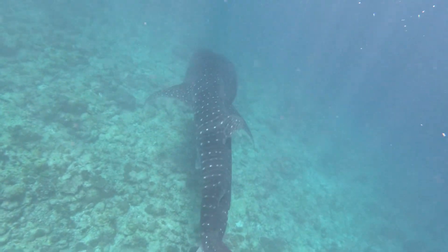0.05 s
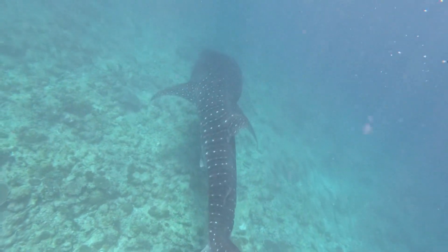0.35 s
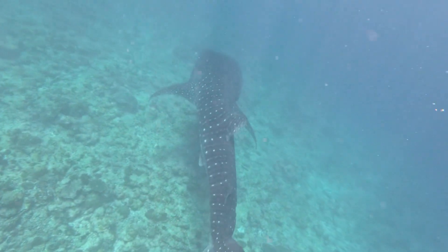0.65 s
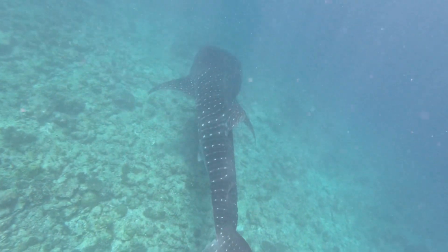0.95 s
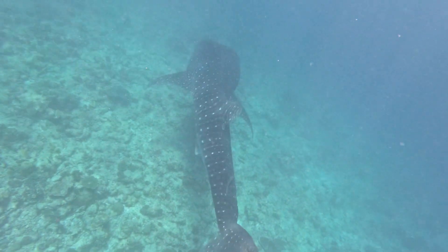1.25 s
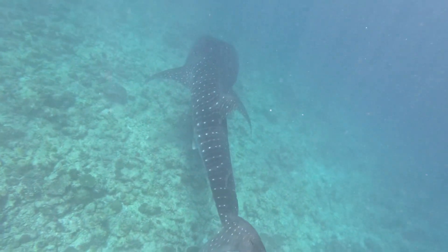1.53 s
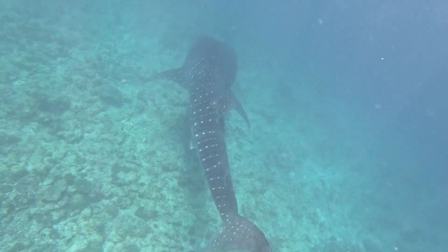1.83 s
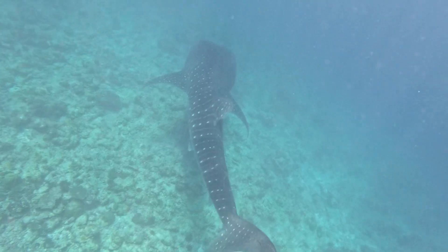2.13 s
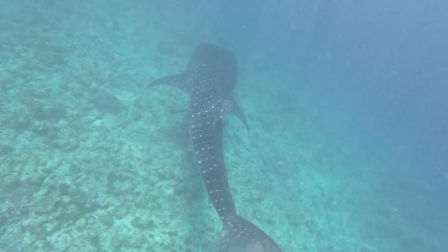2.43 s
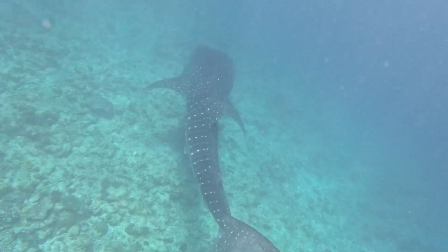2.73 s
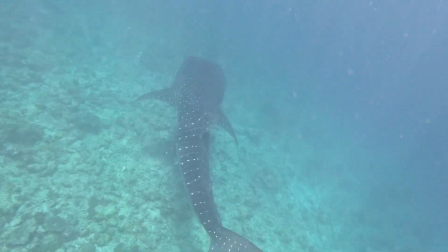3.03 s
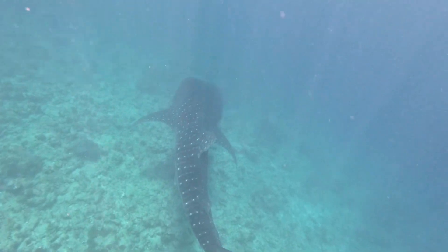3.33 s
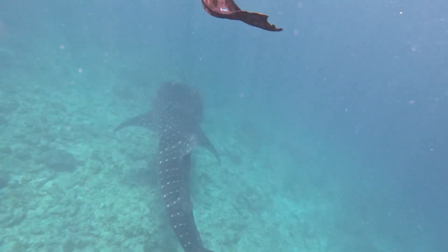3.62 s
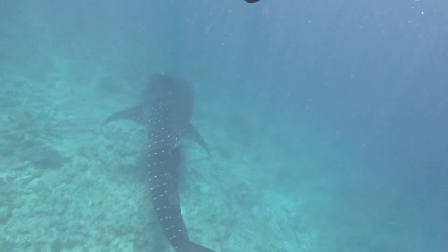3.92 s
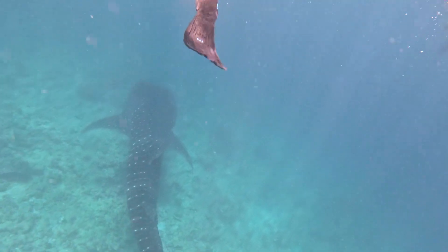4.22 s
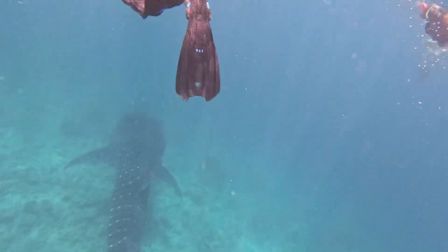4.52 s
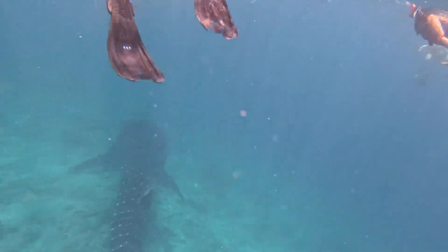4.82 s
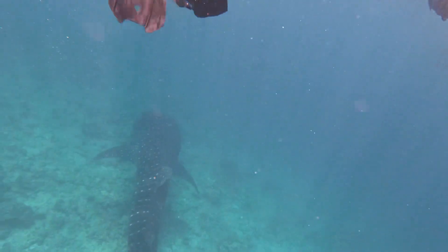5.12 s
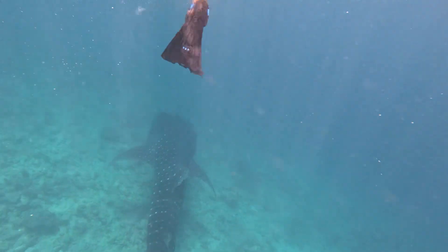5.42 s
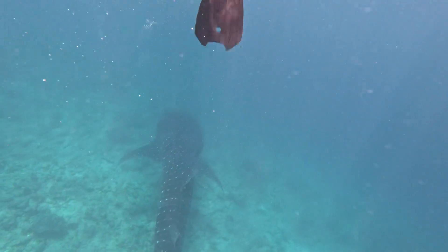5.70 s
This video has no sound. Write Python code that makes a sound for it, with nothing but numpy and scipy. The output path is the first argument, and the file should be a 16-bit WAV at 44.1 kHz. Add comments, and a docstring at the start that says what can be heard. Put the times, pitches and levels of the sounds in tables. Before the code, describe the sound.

Underwater, a muffled low rumble and soft gurgling surround a microphone inside a camera case. After about a second, a stream of small bubbles from kicking swim fins builds, pinging, crackling and popping against the case. One hard knock hits the case past four seconds. The fizzing then thins out, and deeper glugging bubbles take over near the end.

```python
"""Bubbles gurgle, ping and burst around a camera housing carried under water behind kicking swim fins.
Each bubble is a pocket of air ringing at the pitch of its size: large ones gurgle in plumes, small
ones drift by in a stream, pinging and popping against the case and ringing its walls. Flow rumbles on
the housing, snaps come from farther off, and one hard knock makes the limiter duck."""
import sys
import numpy as np
from scipy import signal
from scipy.fft import rfft, irfft
from scipy.io import wavfile
from scipy.ndimage import uniform_filter1d, map_coordinates

SR = 44100
rng = np.random.default_rng(int(sys.argv[2]) if len(sys.argv) > 2 else 0)


def master_out(mix):
    """Clip the mix to full scale and print it as 16-bit PCM to the path in sys.argv[1]."""
    frames = np.transpose(np.atleast_2d(mix))
    ceiling = np.clip(frames, -1, 1)
    pcm = np.round(ceiling * 32767).astype(np.int16)
    wavfile.write(sys.argv[1], SR, pcm)


N = 258426
TIME = np.arange(N) / SR
MID_PITCH_HZ = 1200

# stream of small bubbles arriving, thickening, leaving: t/s, ping level/dB, crackle level/dB
STREAM_LEVELS = [(0, -43, -57), (.45, -50, -62.5), (1.06, -42.5, -59.5), (1.3, -30, -48.5),
                 (1.55, -28.5, -44), (2.1, -28, -39), (2.9, -25, -40), (3.55, -21.5, -41.5),
                 (4.55, -27, -40), (4.82, -37.5, -50), (5.06, -45, -51), (5.17, -36, -58), (5.25, -43, -61),
                 (5.39, -39.5, -60.5), (5.55, -46, -65), (5.86, -50.5, -61.5)]
# commonest pitch in the stream: t/s, f/Hz
STREAM_PITCH = [(1, 1371), (2.2, 1265), (3.8, 1159), (4.6, 1176), (4.9, 1305), (5.8, 1368)]


def amp(db):
    """Decibels to gain."""
    return 10 ** (np.asarray(db) / 20)


def curve(rows, column=1):
    """One column of a control table, per sample."""
    rows = np.asarray(rows)
    return np.interp(TIME, rows[:, 0], rows[:, column])


def spectrum_db(points, hz):
    """Spectrum interpolated over log frequency."""
    f, db = np.transpose(points)
    return np.interp(np.log(hz + 1), np.log(f + 1), db)


def add(mix, start_s, sound):
    """Mix a sound in place."""
    part = mix[round(start_s * SR):][:len(sound)]
    part += sound[:len(part)]


def band(x, edges_hz):
    """Butterworth band-pass."""
    return signal.sosfilt(signal.butter(3, edges_hz, "band", fs=SR, output="sos"), x)


def steady(x, edges_hz, window_s):
    """Scale x to unit running rms in one band."""
    power = band(x, edges_hz) ** 2
    for _ in range(2):
        power = uniform_filter1d(power, int(window_s * SR) + 1)
    return x / np.sqrt(abs(power) + 1e-20)


def resonate(x, hz, width_hz):
    """Unity-gain resonance following a pitch curve."""
    carrier = np.exp(2j * np.pi * np.cumsum(hz) / SR)
    pole = np.exp(-np.pi * width_hz / SR)
    return 2 * (carrier * signal.lfilter([1 - pole], [1, -pole], x / carrier)).real


def response(points, modes=(), size=4096):
    """Minimum-phase impulse response of a broad spectrum plus resonances."""
    hz = abs(np.fft.fftfreq(size, 1 / SR))
    peaks_db = sum(lift_db / (1 + (2 * (hz - f) / width_hz) ** 2) for f, width_hz, lift_db in modes)
    log_gain = np.log(amp(spectrum_db(points, hz) + peaks_db))
    taps = np.fft.ifft(np.exp(np.conj(signal.hilbert(log_gain)))).real[:size // 2]
    return taps * signal.windows.tukey(size)[size // 2:]


def through(x, taps):
    """Convolve, keeping the length."""
    return signal.oaconvolve(x, taps)[:len(x)]


def noise(points):
    """Noise with a spectrum of f/Hz, level/dB points."""
    gain = amp(spectrum_db(points, np.fft.rfftfreq(N, 1 / SR)))
    return irfft(rfft(rng.standard_normal(N)) * gain, N)


def clicks(per_s, spread_db):
    """Random impulses of either sign: many small, a few large."""
    size = amp(spread_db * np.minimum(rng.exponential(1, N), 4))
    return size * rng.choice([-1, 1], N) * (rng.random(N) < per_s / SR)


def passing(events, crests_db, rest_db):
    """Gain of events swelling and fading as they pass; powers add to a resting level."""
    power = amp(rest_db) ** 2
    for (crest_s, half_s, *_), db in zip(events, crests_db):
        power = power + (amp(db) / (1 + ((TIME - crest_s) / half_s) ** 2)) ** 2
    return np.sqrt(power)


def bubble(hz, swell_s, decay_s, glide_oct_per_s=0):
    """An air pocket swells into ringing, glides and dies away; envelope peak 1."""
    t = np.arange(0, 2 * swell_s + 9 * decay_s, 1 / SR)
    envelope = (1 - np.exp(-(t / swell_s) ** 2)) * np.exp(-t / decay_s)
    phase = 2 * np.pi * np.cumsum(hz * 2 ** (glide_oct_per_s * t)) / SR
    return envelope / envelope.max() * np.sin(phase)


def cloud(low_hz, high_hz, per_s, cycles, spread_db):
    """Bubbles of many sizes, each decaying over a few cycles of its own pitch."""
    out, sizes, limit = np.zeros(N), 48, 12000
    starts_s = rng.random(limit) * N / SR
    gains = amp(spread_db * np.minimum(rng.exponential(1, limit), 3.5)) * rng.choice([-1, 1], limit)
    pitches_hz = np.geomspace(low_hz, high_hz, sizes)
    decays_s = cycles * rng.uniform(0.3, 2.05, sizes) / pitches_hz
    glides = rng.normal(0, 3.7, sizes)
    rings = [bubble(hz, 0.21 * s, s, glide) for hz, s, glide in zip(pitches_hz, decays_s, glides)]
    for k in range(min(int(per_s * N / SR), limit)):
        add(out, starts_s[k], gains[k] * rings[k % sizes])
    return out


def housing():
    """Impulse responses of the case: to a burst on its wall, and to sound from open water."""
    # broad wall response: f/Hz, level/dB
    wall = [(250, -38.5), (550, -14), (820, -5.5), (1150, 0), (1450, -3), (1800, -12), (2050, -20),
            (2900, -21), (3700, -17.5), (4300, -25), (5050, -38.5), (5800, -43.5), (6900, -40),
            (8000, -47.5), (9500, -67), (13000, -100)]
    # wall modes: f/Hz, width/Hz, lift/dB
    wall_modes = [(570, 33, 11.5), (1211, 95, 4), (1870, 140, 7), (2820, 93, 1.5), (3590, 230, 6),
                  (6390, 460, 9)]
    # transmission from open water: f/Hz, level/dB
    transmission = [(100, -11.5), (300, 2), (550, 7.5), (740, 3.5), (900, -7.5), (1080, -16), (1370, -14.5),
                    (1750, -37), (2000, -29), (2500, -38), (3300, -35), (4300, -43.5), (5500, -55.5),
                    (9000, -73), (13000, -99)]
    return response(wall, wall_modes), response(transmission)


def flow():
    """Eddies press on the housing: slow sway, quicker buffeting."""
    # flow spectra: f/Hz, level/dB
    sway_spectrum = [(2, -4.5), (9, 5), (28, 0.5), (50, -1), (70, -11.5), (140, -43.5), (400, -89.5)]
    buffet_spectrum = [(30, -29), (60, -2), (110, -2), (140, -8.5), (180, -14), (260, -34), (600, -76),
                       (1200, -100)]
    # surges of water: crest t/s, half-length/s, sway level/dB, buffet level/dB
    surges = [(0.4, 0.022, -31, -19), (0.792, 0.41, -24.5, -29.5), (1.152, 0.031, -19.5, -19.5),
              (1.565, 0.177, -18.5, -23), (2.219, 0.25, -39, -27.5), (2.681, 0.064, -37, -26.5),
              (3.063, 0.055, -16.5, -20), (3.304, 0.065, -27.5, -22.5), (3.571, 0.167, -22, -27.5),
              (4.23, 0.11, -20, -35), (4.724, 0.08, -18.5, -23), (4.968, 0.043, -18, -48.5),
              (5.071, 0.024, -34, -19), (5.581, 0.14, -32.5, -19), (5.789, 0.095, -24.5, -21)]
    _, _, sway_db, buffet_db = np.transpose(surges)
    sway = steady(noise(sway_spectrum), (18, 60), .09) * passing(surges, sway_db, rest_db=-28)
    buffet = steady(noise(buffet_spectrum), (60, 140), .05) * passing(surges, buffet_db, rest_db=-50)
    return amp(-1.3) * sway + amp(0.02) * buffet


def plume_gain(hz, rest_db):
    """Gain of one bubble size: a plume holds fewer the farther they are from its commonest pitch."""
    # plumes of churned air: nearest t/s, half-length/s, level/dB, commonest f/Hz
    plumes = [(0.268, 0.18, -29.5, 421), (0.685, 0.24, -24.5, 414), (1.002, 0.2, -25, 600),
              (1.227, 0.12, -25.5, 412), (1.488, 0.26, -25.5, 428), (2.118, 0.36, -29.5, 306),
              (2.656, 0.16, -28, 347), (3.296, 0.33, -29, 356), (3.399, 0.66, -33.5, 826),
              (3.597, 0.047, -27.5, 630), (3.765, 0.13, -31, 286), (4.104, 0.028, -28, 373),
              (4.257, 0.05, -27.5, 450), (4.632, 0.11, -33, 482), (4.953, 0.035, -33, 770),
              (5.071, 0.011, -24.5, 310), (5.397, 0.21, -25.5, 700), (5.504, 0.15, -19, 284),
              (5.775, 0.053, -27.5, 775), (5.854, 0.07, -19, 228.6)]
    falloff_db_per_oct2 = 9
    crests_db = [db - falloff_db_per_oct2 * np.log2(hz / f) ** 2 for _, _, db, f in plumes]
    return passing(plumes, crests_db, rest_db)


def churn(muffle):
    """Air whipped under by the fins: big pockets glug, smaller ones gurgle, muffled by the case."""
    wander_oct = .12
    pockets = cloud(164.6, 358, per_s=130, cycles=2.86, spread_db=2.5)
    large = cloud(347.9, 621, per_s=260, cycles=4.33, spread_db=2)
    drift = noise([(1, 3), (10, -5), (30, -42.5), (100, -120)])
    wall_mode_hz = 520 * 2 ** (wander_oct * drift / drift.std())
    large = large + amp(-1.5) * resonate(large, wall_mode_hz, width_hz=75)  # the case's lowest wall mode rings along, its pitch wandering
    medium = cloud(636.6, 824, per_s=220, cycles=3.9, spread_db=3)
    pockets = steady(through(pockets, muffle), (160, 340), .11) * plume_gain(hz=227, rest_db=-40.5)
    large = steady(through(large, muffle), (380, 620), .13) * plume_gain(hz=446, rest_db=-45)
    medium = steady(through(medium, muffle), (640, 860), .11) * plume_gain(hz=780, rest_db=-53)
    return amp(-2.5) * pockets + large + amp(-2) * medium


def shifting_modes(x):
    """Upper resonances of the case sink and rise with the pitch of the stream."""
    # peaks and dips: f/Hz at mid pitch, width/Hz, lift/dB, pitch-tracking exponent
    modes = [(2274, 85, 15.5, 0.18), (2533, 180, -8.5, 0.56), (2700, 80, 2, 0.99), (2970, 230, -5, 1),
             (3260, 130, 4.5, 0.44)]
    ratio = curve(STREAM_PITCH) / MID_PITCH_HZ
    for hz, width_hz, lift_db, exponent in modes:
        x = x + (amp(lift_db) - 1) * resonate(x, hz * ratio ** exponent, width_hz)
    return x


def pinging(case):
    """Small bubbles ping beside the case, lower in pitch while the stream is coarser."""
    pitch_hz = curve(STREAM_PITCH)
    pings = cloud(897, 1812, per_s=700, cycles=2.87, spread_db=2.5)
    speed = (pitch_hz / MID_PITCH_HZ) ** 1.4  # all sizes shift with the commonest pitch
    pings = map_coordinates(pings, [np.cumsum(speed)], order=1, mode="wrap")
    pings = shifting_modes(through(pings, case))
    pings = pings + amp(6.5) * resonate(pings, pitch_hz, width_hz=100)  # like sizes ring together
    return amp(-2.5) * steady(pings, (1000, 1600), .2) * amp(curve(STREAM_LEVELS))


def wall_contact():
    """How much of the stream bursts right on the case, 0-1."""
    touch_s, rise_s, leave_s, fall_s, stray_share = 1.04, 0.11, 5.273, 0.46, 0.18
    touch = np.minimum((TIME - touch_s) / rise_s, (leave_s - TIME) / fall_s)
    return np.clip(stray_share + np.maximum(touch, 0), 0, 1)


def crackle(case, muffle):
    """Clumped bursts ring the walls, the tiniest bubbles tinkle, far bursts merge into a soft bed."""
    level_db, full_density_db = curve(STREAM_LEVELS, column=2), -46.5
    clumps = noise([(1, 2), (25, -5.5), (70, -12), (170, -33), (500, -95.5)])
    bursts = clicks(per_s=2400, spread_db=4) * amp(3.66 * clumps / clumps.std())
    kept = rng.random(N) < amp(level_db - full_density_db)  # a weak stream thins out
    bursts = through(bursts * kept, case)
    tinkle = through(cloud(2150, 4440, per_s=410, cycles=6, spread_db=4), case)
    near = bursts / band(bursts, (2100, 4500)).std() + amp(-4.5) * tinkle / tinkle.std()
    near = steady(shifting_modes(near), (2100, 4500), .12)
    ticks = band(clicks(per_s=400, spread_db=5), (1100, 6000))
    far = through(rng.standard_normal(N) + amp(-5.5) * ticks / ticks.std(), muffle)
    far = steady(far, (2100, 4500), .3)
    contact = wall_contact()
    return (amp(-1.1) * near * contact + far * np.sqrt(1 - contact ** 2)) * amp(level_db)


def gush_gain():
    """Gushes thrown by the fins briefly lift or dip the level of the stream."""
    # crest t/s, half-length/s, gain/dB
    gushes = [(1.276, 0.02, -0.5), (1.702, 0.018, -2.5), (2.58, 0.097, 1.5), (3.183, 0.081, 1.5),
              (3.427, .025, 4), (4.03, 0.042, 3.5), (4.13, .05, -0.5), (4.526, 0.042, 1.5),
              (5.048, .05, -3.5)]
    return amp(sum(db * np.exp(-((TIME - crest_s) / half_s) ** 2) for crest_s, half_s, db in gushes))


def wall_hum():
    """Bubbles bumping along the case keep its lowest mode ringing, less as the stream goes by."""
    mode_hz, width_hz, sag_db_per_s = np.full(N, 543), 79, 2.5
    bumps = clicks(per_s=200, spread_db=1)
    hum = resonate(resonate(bumps, mode_hz, width_hz), mode_hz, 2 * width_hz)
    gain = amp(-31.5 - sag_db_per_s * np.maximum(TIME - 2, 0)) * wall_contact()
    return steady(hum, (380, 700), .15) * gain


def hollow(x):
    """A moving spectral dip between gurgle and pinging, deepest as the stream leaves."""
    # t/s, f/Hz, width/Hz, gain/dB
    dip = [(0, 1000, 119.5, -5.5), (.9, 1028, 119.3, 3.5), (1.4, 1030, 128, -14), (1.9, 845, 109.3, -13),
           (2.7, 790, 129, -3), (3.3, 640, 59.5, -10), (4.1, 635, 60, -1), (4.5, 834, 90, -5),
           (4.8, 960, 150, -14), (4.95, 1010, 169, -36), (5.1, 1010, 149, -19.5), (5.35, 1000, 119, -8)]
    hz, width_hz, gain_db = (curve(dip, column) for column in (1, 2, 3))
    for side in (-1, 1):  # two close notches make a flat bottom
        x = x + (amp(gain_db / 2) - 1) * resonate(x, hz + side * width_hz / 4, width_hz=120)
    return x


def near_bubbles():
    """Single bubbles close enough to stand out, wobbling as they ring."""
    # t/s, f/Hz, level/dB, swell/s, decay/s, glide/(oct/s)
    bubbles = [(.002, 376, -18, 0.0018, 0.016, 0), (.165, 494, -18, 0.0081, 0.015, -11),
               (.285, 280, -21, 0.0064, 0.017, -1.5), (.38, 554, -17, 0.0054, 0.012, 1.5),
               (.505, 580, -22.5, 0.0055, 0.014, -1.5), (.555, 435, -19.5, 0.006, 0.013, 0),
               (.607, 1950, -40, .002, 0.0046, 0), (.65, 581, -15.5, .008, 0.013, 1),
               (.681, 1353, -25.5, 0.013, 0.0086, -1), (.735, 455, -26, 0.0063, .016, -0.5),
               (.802, 1052, -25.5, 0.0067, 0.0065, -1.5), (.995, 460, -17, 0.011, 0.017, 9),
               (1.084, 667, -15.5, 0.0082, 0.012, -6.5), (1.119, 2220, -39, .002, 0.0064, 1),
               (1.183, 486, -17, 0.011, 0.017, -6), (1.22, 507, -20, .007, 0.016, 4.5),
               (1.483, 583, -16, 0.0076, 0.0068, -1), (1.506, 1305, -14, 0.0027, 0.0033, -1),
               (1.633, 1154, -18.5, .005, .009, 4), (1.778, 1334, -19, .003, .008, -1),
               (1.829, 420, -14.5, .002, 0.0067, 7), (2.065, 990, -18, .0014, 0.0039, -6),
               (2.12, 1413, -16, .0033, 0.0055, -7), (2.168, 1340, -10, .0015, 0.0029, -9),
               (2.219, 1078, -16, 0.0026, 0.0053, 2), (2.317, 1224, -13, 0.00093, .011, -3),
               (2.521, 1054, -14, .0018, 0.006, 4), (2.612, 512, -19, 0.0062, 0.017, 0),
               (2.7504, 1213, -11, .001, 0.003, -5), (2.8125, 1273, -9.5, 0.0017, 0.0073, -8),
               (2.846, 562, -14.5, 0.0059, 0.008, 0.5), (2.857, 1178, -15.5, 0.0026, .0064, 2),
               (2.89, 1091, -12, 0.0034, 0.0089, -1), (2.995, 1205, -13, .001, 0.0077, 0),
               (3.211, 1336, -18, 0.0019, .006, 4), (3.373, 569, -11.5, 0.00082, 0.01, -2.5),
               (3.394, 532, -14, .003, 0.0068, -1), (3.45, 1423, -11, .0023, 0.0076, -4),
               (3.509, 1190, -14.5, 0.00073, .0045, -1), (3.589, 347, -6, 0.0008, 0.0032, 6),
               (3.59, 720, -21, .001, .004, 13), (3.602, 468, -12.5, .0033, .0087, -1),
               (3.625, 1650, -18.5, .001, .003, 0), (3.6505, 1260, -5.5, 0.0013, .0039, 3),
               (3.677, 1172, -13, .0008, .0069, 2), (3.747, 1024, -11, .0009, 0.012, -6.5),
               (3.757, 2610, -33, .0027, .0076, 0), (3.773, 1130, -9, 0.002, 0.0053, 0),
               (3.815, 2620, -23.5, .0017, .004, 3), (3.834, 973, -9, 0.0044, 0.0039, -4.5),
               (3.836, 1086, -8, .0015, 0.0034, 2), (3.836, 523, -17, 0.0023, 0.0081, -6.5),
               (4.104, 483.5, -20.5, .0036, .0062, 7), (4.11, 1097, -11.5, .0008, 0.0031, 0),
               (4.571, 587, -18, 0.0079, .0067, -1.5), (4.941, 565, -19, .0058, 0.0071, 1),
               (5.073, 128.7, -23, .0072, 0.0054, -3), (5.084, 148, -12, 0.0067, 0.0037, 1),
               (5.136, 623, -14.5, 0.0076, .008, 8.5), (5.214, 225, -8, 0.0017, 0.0045, -5),
               (5.266, 721, -13.5, .0045, 0.0084, 3.5), (5.272, 310, -8.5, 0.0025, 0.0073, -7),
               (5.297, 1287, -24.5, .002, .007, -2), (5.3, 228.7, -7.5, 0.0025, 0.0047, -9),
               (5.325, 770, -19.5, .005, .01, -0.5), (5.339, 1514, -21, 0.0018, 0.0068, -13),
               (5.357, 672, -13.5, 0.0062, .013, -3), (5.385, 375, -13.5, 0.0057, .013, 6.5),
               (5.429, 714, -15, 0.0089, .011, 6), (5.447, 562, -14, .006, 0.0083, -8.5),
               (5.482, 762, -13.5, 0.002, .0043, 3), (5.498, 237, -13, 0.0024, 0.0067, -4),
               (5.533, 125, -8, 0.005, 0.012, -3), (5.54, 520, -17, .005, .012, -8),
               (5.578, 177, -10, .004, 0.01, 11), (5.6, 655, -17.5, 0.0044, 0.012, 5.5),
               (5.618, 101, -12.5, 0.0086, 0.024, -4), (5.649, 577, -18, .0027, 0.023, 0.5),
               (5.68, 99.6, -13, .008, 0.018, -3), (5.748, 114, -11, 0.0054, 0.018, 2),
               (5.79, 108.8, -21, 0.0049, 0.014, -4), (5.843, 185, -9, 0.0075, 0.011, 5)]
    flutter_hz, flutter_depth = 144, 0.19
    out = np.zeros(N)
    for start_s, hz, db, swell_s, decay_s, glide in bubbles:
        add(out, start_s, amp(db) * bubble(hz, swell_s, decay_s, glide))
    flutter = band(rng.standard_normal(N), (flutter_hz / 2, flutter_hz * 2))
    return amp(-0.23) * out * (1 + flutter_depth * flutter / flutter.std())


def cracks(events, taps, rise_s, decay_s, roughness):
    """Each bubble collapse is a spike plus a brief rough burst, heard through taps."""
    t, out = np.arange(len(taps)) / SR, np.zeros(N)
    for start_s, db, *_ in events:
        burst = rng.standard_normal(len(t)) * (1 - np.exp(-t / rise_s)) ** 2 * np.exp(-t / decay_s)
        crack = taps + roughness * through(burst / np.linalg.norm(burst), taps)
        add(out, start_s, amp(db) * crack / abs(band(crack, (2500, 8000))).max())
    return out


def far_snaps(muffle):
    """Muffled collapses farther off, each leaving a small bubble ringing softly."""
    # t/s, relative level/dB
    snaps = [(.023, -56), (.0333, -56), (.1076, -65), (.1485, -53), (.177, -56), (.199, -56),
             (0.2287, -52.5), (.261, -55), (0.2688, -48.5), (0.314, -54), (0.35, -55), (.479, -55),
             (.489, -56.5), (.5, -58), (.5263, -56), (0.559, -59), (.61, -58), (0.73, -56), (.758, -55),
             (0.817, -52.5), (0.846, -52), (0.9125, -56), (0.9223, -54), (1.012, -48.5), (1.0607, -58),
             (1.1863, -48.5), (4.894, -51), (4.913, -53), (4.931, -46), (4.9464, -47), (4.982, -53),
             (5.0255, -54), (5.037, -50), (5.0637, -45.5), (5.077, -50), (5.1715, -48.5), (5.3702, -60),
             (5.3973, -48), (5.467, -61.5), (5.5278, -54.5), (5.655, -59.5), (5.7, -56.5), (5.7689, -50.5)]
    ring_s = 0.0038
    taps = band(muffle, (1500, 6000))
    out = amp(11.5) * cracks(snaps, taps, rise_s=0.0006, decay_s=0.002, roughness=1.3)
    for (start_s, db), hz in zip(snaps, rng.uniform(1200, 1500, len(snaps))):
        add(out, start_s, amp(db + 15) * bubble(hz, ring_s / 3, ring_s))
    return out


def wall_pops(case):
    """Bubbles crack on the case; the air left rings hard against the wall, then sings on softly."""
    # t/s, crack level/dB, ring level/dB
    pops = [(1.2877, -29.5, -21), (1.4273, -31, -20), (1.5876, -24, -18), (1.6394, -32, -25),
            (1.7678, -28, -17), (1.812, -28, -22), (1.8516, -25, -30), (1.9112, -22, -8.5),
            (1.9657, -20, -15), (1.9904, -35, -12.5), (2.0249, -23, -9), (2.0633, -28.5, -14.5),
            (2.1114, -18.5, -13), (2.1196, -28, -22), (2.1502, -30, -11.5), (2.1658, -23, -9),
            (2.1847, -22, -11), (2.2372, -27.5, -14), (2.318, -23, -12.5), (2.3274, -25, -16),
            (2.4213, -22, -18), (2.4836, -19, -16), (2.4985, -23, -14), (2.5174, -21, -11),
            (2.5374, -33, -14), (2.5743, -25.5, -21), (2.7141, -25, -19), (2.7514, -22, -12),
            (2.7859, -29, -32), (2.8664, -30, -11.5), (2.899, -30, -11), (2.935, -34, -22),
            (2.9452, -31, -20), (2.9947, -26, -17), (3.0282, -24, -8), (3.0422, -18, -11.5),
            (3.0752, -31, -26), (3.089, -29.5, -14.5), (3.1406, -25, -19), (3.1703, -21, -23),
            (3.2119, -25.5, -10.5), (3.2905, -17, -17), (3.3283, -21, -9), (3.3399, -21, -17),
            (3.4086, -26.5, -21), (3.418, -27, -21), (3.4397, -24, -21), (3.4882, -20.5, -10),
            (3.5429, -26.5, -22), (3.566, -23, -19), (3.5817, -25, -19), (3.7166, -28.5, -16.5),
            (3.8769, -26.5, -31), (3.928, -24.5, -16), (3.9537, -27, -10), (3.9945, -34, -18),
            (4.0173, -26, -23), (4.0369, -26, -19), (4.0452, -23.5, -8), (4.0501, -20, -12.5),
            (4.1675, -28.5, -23), (4.1758, -27, -26), (4.1924, -21.5, -16), (4.2544, -21.5, -16.5),
            (4.3782, -31, -19), (4.4075, -28, -16), (4.4364, -24.5, -20), (4.4603, -32, -24),
            (4.5025, -26, -21), (4.5097, -26, -24), (4.5314, -23.5, -28), (4.5575, -30, -18),
            (4.604, -27, -25), (4.629, -24.5, -24), (4.6575, -28, -23), (4.6966, -24.5, -9.5),
            (4.7365, -32, -13), (4.7709, -21.5, -7.5), (4.83, -34.5, -35), (4.846, -35, -26),
            (4.9648, -35, -22.5), (4.9934, -33.5, -12), (5.1089, -30.5, -23)]
    ring_s, tail_s, tail_hz, tail_spread_oct = 0.0011, .006, 1281, .35
    taps = band(case, (2000, 7500))
    collapses = cracks(pops, taps, rise_s=0.00038, decay_s=0.00075, roughness=0.97)
    rings = np.zeros(N)
    for start_s, _, ring_db in pops:
        ring = signal.oaconvolve(bubble(rng.uniform(1210, 1687), ring_s / 4, ring_s), case)
        tail = bubble(tail_hz * 2 ** (tail_spread_oct * rng.uniform(-.5, .5)), ring_s, tail_s)
        add(rings, start_s, amp(ring_db) * ring / abs(ring).max())
        add(rings, start_s, amp(ring_db - 9.5) * tail)
    return amp(-0.35) * collapses + amp(-3) * rings


def knock():
    """A hard blow straight on the housing: ringing modes, a rough contact clack, a dull shove."""
    # f/Hz, level/dB, t60/s
    modes = [(600, -6.5, .005), (1030, 0.5, 0.01), (2720, -14.5, 0.0079)]
    start_s, clack_decay_s, shove_crest_s = 4.2614, 0.0021, 0.0024
    t, out = np.arange(0, .04, 1 / SR), np.zeros(N)
    ring = sum(amp(db - 60 * t / t60_s) * np.sin(2 * np.pi * hz * t) for hz, db, t60_s in modes)
    clack = band(rng.standard_normal(len(t)) * np.exp(-t / clack_decay_s), (120, 1900))
    shove = (t / shove_crest_s) ** 2 * np.exp(1 - (t / shove_crest_s) ** 2)
    blow = amp(-5.5) * clack - ring - amp(-3) * shove
    blow = signal.sosfilt(signal.butter(4, 3300, fs=SR, output="sos"), blow)
    add(out, start_s, amp(12.5) * blow / abs(blow).max())
    return out


def scene():
    """All sources at the one microphone inside the housing."""
    case, muffle = housing()
    pops = shifting_modes(wall_pops(case))
    snaps = far_snaps(muffle)
    stream = (pinging(case) + crackle(case, muffle)) * gush_gain()
    bubbles = hollow(churn(muffle) + wall_hum() + stream + pops)
    return (flow() + bubbles + near_bubbles() + snaps + knock())[None]


def record(dry):
    """Limiter with fast attack and steady release, then edge fades and a low-pass."""
    ceiling_db, release_db_per_s, cutoff_hz = -2, 115, 15100
    over_db = np.maximum(20 * np.log10(abs(dry[0]) + 1e-9) - ceiling_db, 0)
    release_db = release_db_per_s * TIME
    held_db = np.maximum.accumulate(over_db + release_db) - release_db
    limited = dry / amp(uniform_filter1d(held_db, size=24, origin=-11))
    faded = limited * signal.windows.tukey(N, .001)
    lowpass = signal.firwin(255, cutoff_hz, window=("kaiser", 9), fs=SR)
    return signal.oaconvolve(faded, lowpass[None], "same")


dry = scene()
out = record(dry)
master_out(out)
```